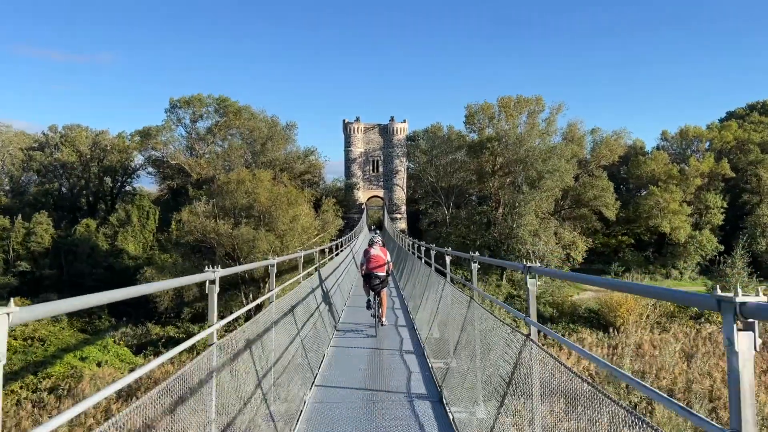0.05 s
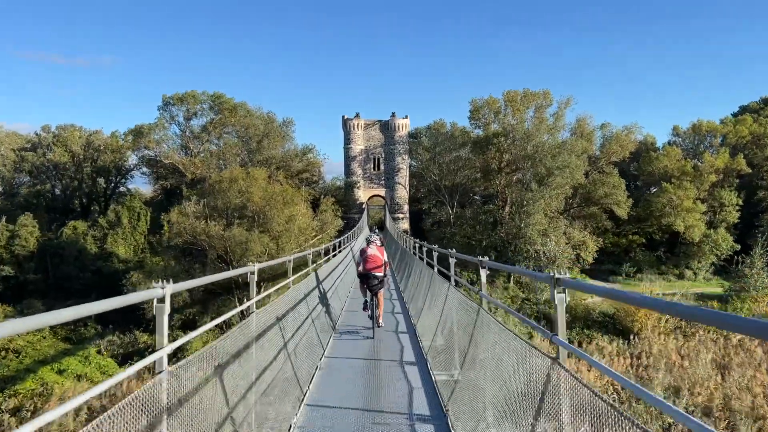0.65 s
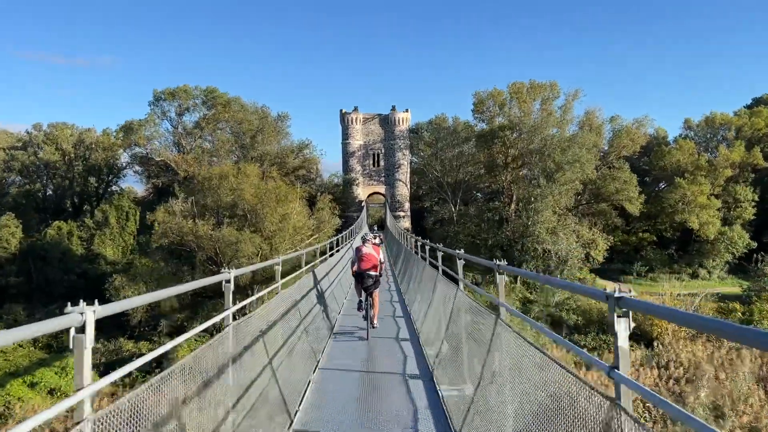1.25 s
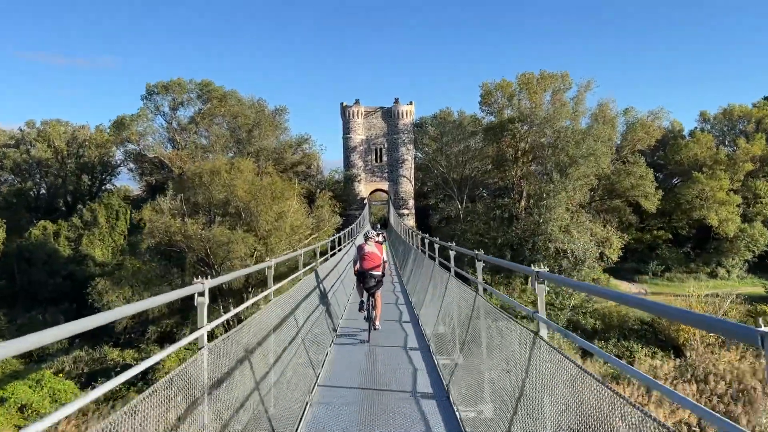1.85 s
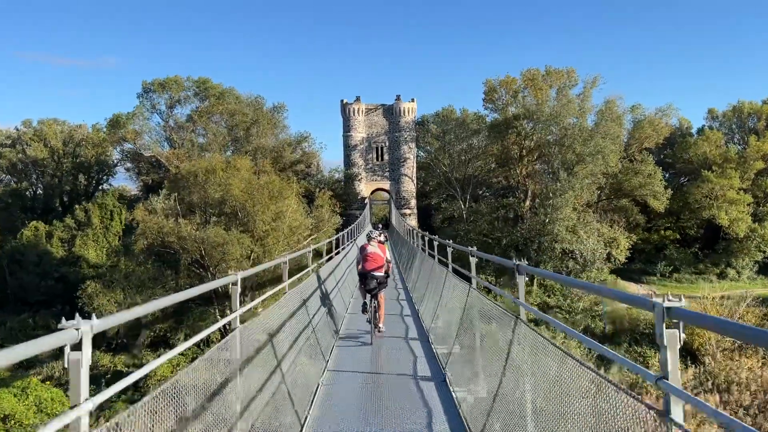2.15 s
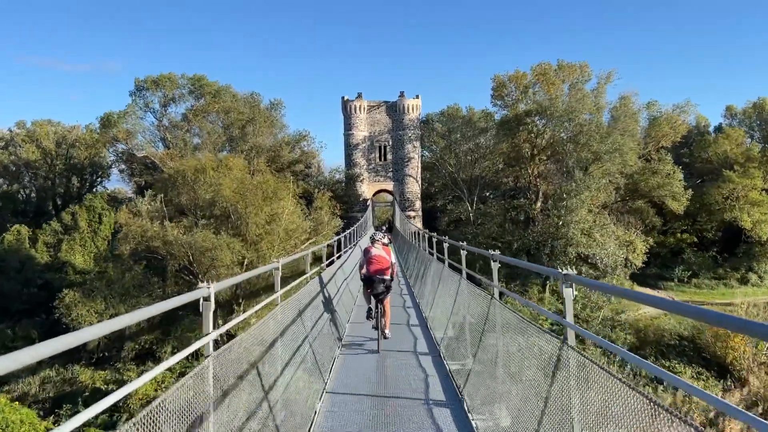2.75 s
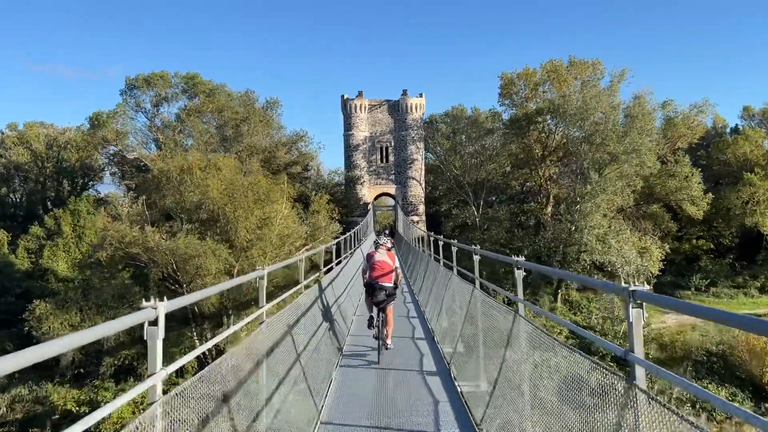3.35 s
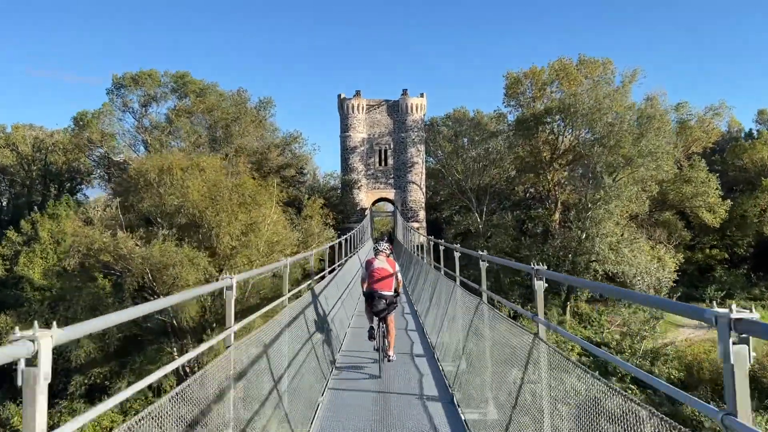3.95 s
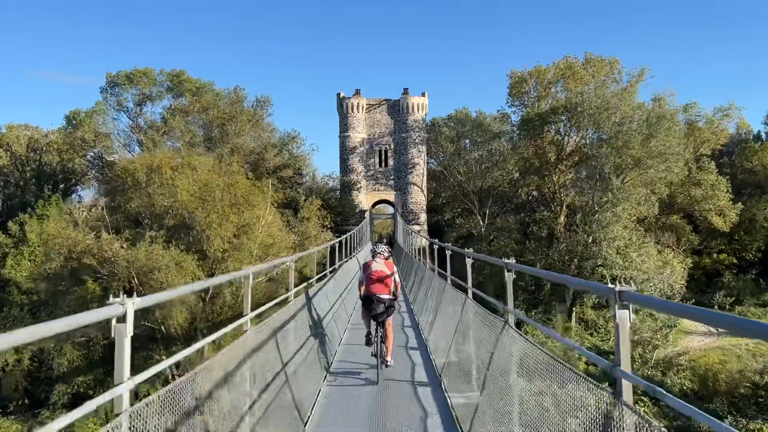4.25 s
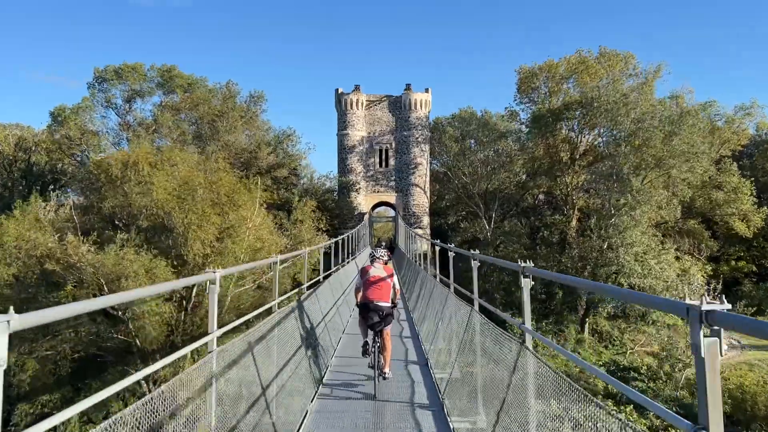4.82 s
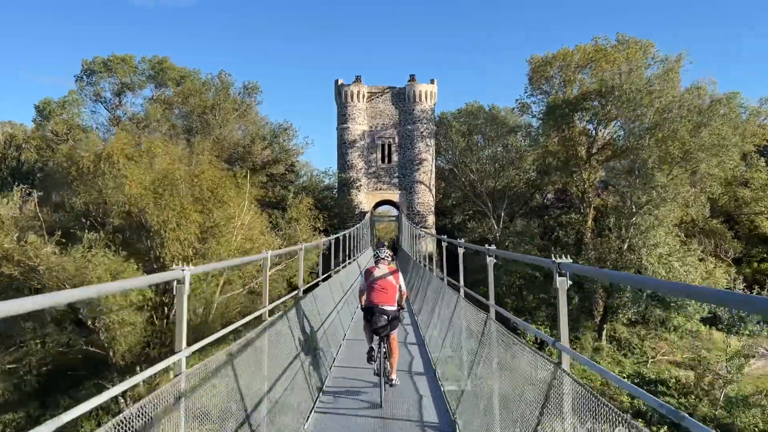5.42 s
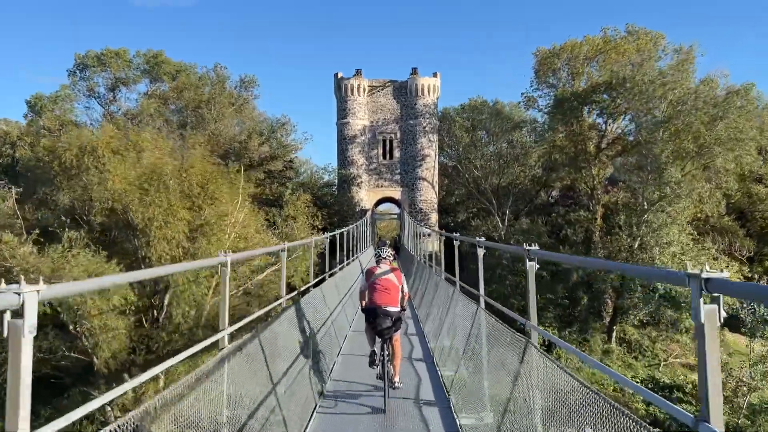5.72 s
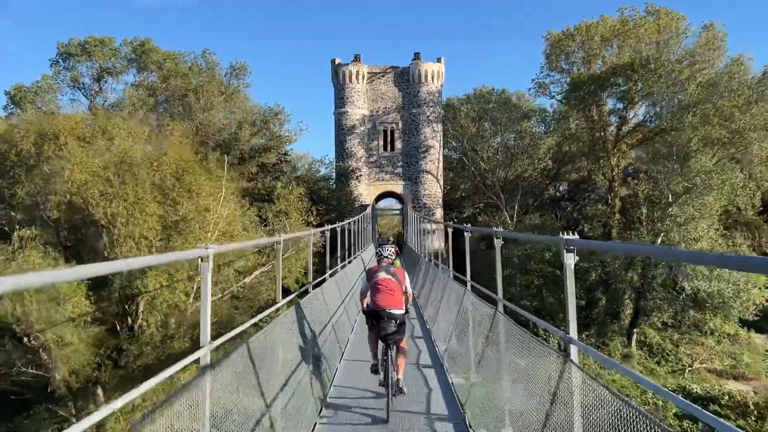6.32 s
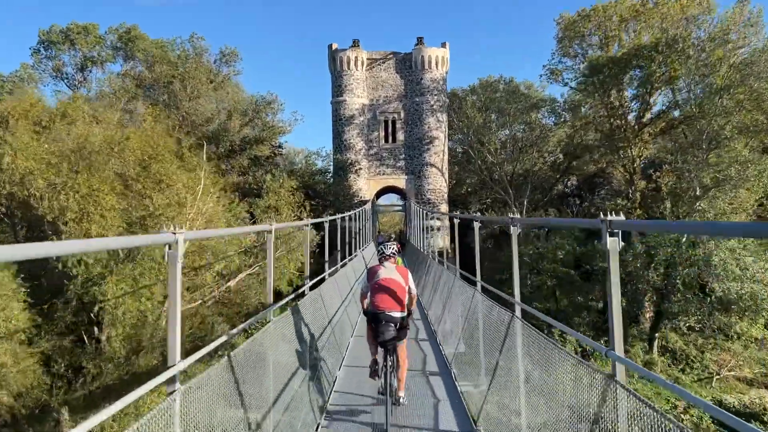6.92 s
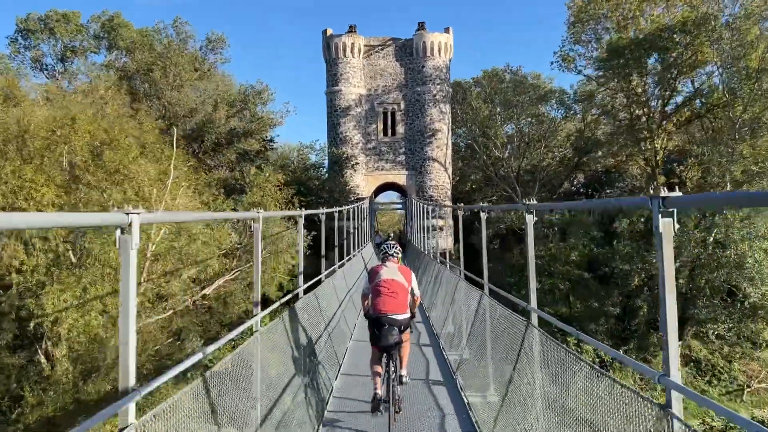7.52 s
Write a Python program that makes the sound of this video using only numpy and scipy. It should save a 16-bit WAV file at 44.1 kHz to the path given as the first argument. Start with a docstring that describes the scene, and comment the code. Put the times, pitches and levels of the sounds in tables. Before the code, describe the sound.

Two bicycles roll over a metal footbridge, tyres knocking and clattering at each joint while wind buffets the microphone.

```python
"""Hollow knocks and metal clatter, close up: two bicycles cross the deck of a suspension footbridge.
At each panel joint the front and then the rear tyre knocks, and the panel clatters under it.
Between joints the tyres drum on the deck, loose parts rattle and the steelwork rings faintly.
The stereo microphone rides on the rear bicycle, out in the headwind that buffets it."""
import sys
import numpy as np
from scipy import signal
from scipy.fft import rfft, irfft, next_fast_len
from scipy.io import wavfile
from scipy.ndimage import map_coordinates

SR = 44100
rng = np.random.default_rng(int(sys.argv[2]) if len(sys.argv) > 2 else 0)


def store_wav(level_fs):
    """Save 16-bit WAV to argv[1]."""
    pcm = np.round(np.clip(np.atleast_2d(level_fs), -1, 1) * 32767)
    wavfile.write(sys.argv[1], SR, pcm.T.astype(np.int16))


N = 333837


def amp(db):
    """Decibels to gain."""
    return 10 ** (np.asarray(db) / 20)


def unit(x):
    """x at rms 1."""
    return x / np.sqrt(np.mean(x ** 2) + 1e-20)


def luck(shape):
    """Even chance between minus one and one."""
    return rng.uniform(-1, 1, shape)


def along(points, hz):
    """(Hz, value) points joined on a log axis."""
    f, v = np.transpose(points)
    return np.interp(np.log(hz + 1), np.log(f + 1), v)


def curve(points):
    """(s, value) points joined, one value a sample."""
    return np.interp(np.arange(N) / SR, *np.transpose(points))


def wobble(rate):
    """A smooth random curve, rate knots a second."""
    knots = rng.standard_normal(int(N * rate / SR) + 4)
    return map_coordinates(knots, [np.arange(N) * rate / SR])


def struck(t, t60, rise):
    """The envelope of a blow: quick rise, exponential decay; times in seconds."""
    return amp(-60 * t / t60) * (1 - np.exp(-t / rise))


def filtered(x, response):
    """x times a complex response of frequency."""
    size = next_fast_len(N + SR // 2)
    return irfft(rfft(x, size) * response(np.fft.rfftfreq(size, 1 / SR)), size)[..., :N]


def add(track, s, sound):
    """Mix a sound into a track from time s on."""
    start = max(round(s * SR), 0)
    part = sound[..., :N - start]
    track[..., start:start + part.shape[-1]] += part


def buffet(level_db, spectrum, lump_db, rate):
    """Eddies of one size pass the microphone in lumps."""
    air = unit(filtered(rng.standard_normal((2, N)), lambda hz: amp(along(spectrum, hz))))
    return amp(level_db) * unit(air * amp(lump_db * wobble(rate)))


# single eddies right on the microphone: t/s, swell level/dB, pop level/dB
THUMPS = [(0.1426, -21, -18.5), (1.158, -13.5, -18), (2.782, -25, -12), (3.19, -22, -18), (3.203, -13, -18),
          (4.491, -22, -22), (4.846, -12, -30), (5.074, -26, -20), (5.084, -28, -25), (5.707, -32, -19.5),
          (5.906, -29, -24), (6.248, -35, -25), (6.711, -30, -19), (6.972, -20, -20), (7.053, -23, -22),
          (7.135, -30, -22)]
# spectrum of their swell: f/Hz, level/dB
THUMP_SPECTRUM = [(30, -32), (70, 2), (130, 8), (230, -1.5), (330, -0.5), (480, -0.5), (700, -5),
                  (2000, -47)]
def thumps(swell_db, swell_s, pop_s):
    """An eddy swells, pops with one pressure pulse and collapses."""
    swells, pops, t = np.zeros(N), np.zeros(N), np.arange(SR // 6) / SR
    u = (t - swell_s) / pop_s
    for s, db, pop_db in THUMPS:
        add(swells, s - swell_s, amp(db + swell_db) * (t / swell_s) ** 2 * np.exp(2 - 2 * t / swell_s))
        add(pops, s - swell_s, amp(pop_db) * (1 - u ** 2) * np.exp(-u ** 2 / 2))
    air = buffet(0, THUMP_SPECTRUM, lump_db=1.5, rate=30)
    return swells * air + pops * [[1], [0]]  # both ports feel a pop alike


def gusting(breeze_db, starts, lengths, levels, attack_s=0.01, release_s=0.023):
    """Wind level in dB: gusts rise, hold and drop back into the breeze."""
    t = np.arange(N) / SR
    power = amp(breeze_db) ** 2
    for s, length, db in zip(starts, lengths, levels):
        shape = np.clip((t - s) / attack_s, 0, 1) * np.clip(1 - (t - s - length) / release_s, 0, 1)
        power += (amp(db) * shape) ** 2
    return 10 * np.log10(power)


# steady airflow over the moving microphone: t/s, level/dB
BREEZE = [(0, -39.5), (2.2, -37), (3.1, -42), (3.8, -44), (4.2, -36.5), (5.3, -40.5), (6.8, -39),
          (7.57, -41)]
# gusts: t/s, length/s, rumble level/dB, flutter level/dB
GUSTS = [(0.01, 0.12, -34, -33), (0.636, 0.16, -32, -29), (0.93, 0.26, -30.5, -33.5),
         (1.58, 0.18, -32.5, -31), (1.834, 0.075, -35, -29.5), (2.352, 0.36, -30.5, -27.5),
         (2.557, 0.33, -28.5, -27.5), (3.163, 0.087, -33, -28.5), (4.145, 0.055, -40, -51),
         (4.342, 0.18, -37, -34), (4.796, 0.12, -28, -30.5), (5.04, 0.037, -27.5, -39),
         (5.532, 0.2, -33.5, -40), (5.847, 0.074, -27.5, -26), (6.122, 0.33, -37, -36),
         (6.682, 0.26, -35.5, -35), (6.94, 0.18, -31, -34.5)]
# spectra of large and of small eddies: f/Hz, level/dB
RUMBLE_SPECTRUM = [(10, -40), (25, -23), (38, -7), (52, -1.5), (90, 2.5), (125, -0.5), (190, -12.5),
                   (500, -62)]
FLUTTER_SPECTRUM = [(40, -34), (95, -19), (140, -3.5), (185, -5.5), (225, -2), (300, -11), (450, -15.5),
                    (900, -64), (3000, -69)]
def headwind():
    """Air on the microphone: large eddies rumble, smaller ones flutter, a few thump."""
    breeze_db = curve(BREEZE)
    starts, lengths, rumble_peaks, flutter_peaks = np.transpose(GUSTS)
    rumble_db = gusting(breeze_db, starts, lengths, rumble_peaks)
    flutter_db = gusting(breeze_db + 3, starts, lengths, flutter_peaks)
    rumble = buffet(rumble_db - 0.5, RUMBLE_SPECTRUM, lump_db=2, rate=22)
    flutter = buffet(flutter_db - 4, FLUTTER_SPECTRUM, lump_db=2.5, rate=31)
    return rumble + flutter + thumps(swell_db=-10.5, swell_s=0.0095, pop_s=0.0012)


# lightly damped modes of the bridge steel: f/Hz, level/dB, t60/s
STEEL_MODES = [(2627, -5.5, 0.56), (3235, -5, 1), (3975, 0.5, 0.76), (4500, -8, 0.58), (4720, 2, 0.2),
               (5310, -6, 0.67), (6500, -13, 0.37), (6020, -9, 0.92), (7050, -13, 0.76), (6955, -9, 0.7)]
# blows that make the nearest mode sing out: t/s, f/Hz, level/dB
SINGING = [(0.3, 3975, -41), (1.184, 3975, -36.5), (1.184, 6020, -38), (1.184, 7050, -40),
           (1.385, 5310, -45), (1.385, 2627, -46), (1.621, 2627, -34), (1.621, 3975, -40),
           (2.908, 3975, -36), (3.108, 6020, -54), (3.34, 3975, -35), (3.54, 2627, -35), (3.54, 3975, -42),
           (3.776, 3235, -38), (5.335, 3235, -35), (5.578, 4500, -33), (6.035, 4500, -48),
           (6.317, 4500, -39), (6.515, 3975, -36), (6.737, 4500, -38), (6.995, 3235, -50),
           (7.22, 6955, -38), (7.22, 4500, -44)]
def steelwork(level_db, spread_db, detune, waver_rad):
    """Every blow leaves the steel around the bicycles ringing faintly; now and then one mode sings."""
    track, t = np.zeros((2, N)), np.arange(SR * 3 // 4) / SR
    nearest = lambda near_hz: min((mode[0] for mode in STEEL_MODES), key=lambda hz: abs(hz - near_hz))
    blows = [(s, db) for s, *_, db, _, _ in CROSSINGS] + [(s, db) for s, db, *_ in RATTLES]
    panel = np.searchsorted(sorted(row[0] for row in CROSSINGS), np.arange(N) / SR)
    for hz, mode_db, t60 in STEEL_MODES:
        power, ring = np.zeros(N), struck(t, t60, rise=0.0023)
        for (s, db), share in zip(blows, luck(len(blows))):
            add(power, s, (amp(db + level_db + mode_db + spread_db * share) * ring) ** 2)
        for s, near_hz, db in SINGING:
            if nearest(near_hz) == hz:
                add(power, s, (amp(db) * struck(t, t60=2.1, rise=0.0023)) ** 2)
        # each panel is tuned a little differently, and continued shaking makes the phase wander
        pitch = hz * (1 + detune * luck((2, len(CROSSINGS) + 1)))[:, panel]
        wander = waver_rad * np.cumsum(rng.standard_normal((2, N)), axis=1) / np.sqrt(SR)
        track += np.sqrt(power) * np.sin(2 * np.pi * np.cumsum(pitch, axis=1) / SR + wander)
    return track


def contacts(rate, spread_db, hiss, size=N):
    """Two unrelated streams of tiny impacts, rate a second, over smooth friction noise."""
    shape = (2, size)
    hits = (rng.random(shape) < rate / SR) * rng.choice([-1, 1], shape)
    strength = amp(spread_db * rng.standard_normal(shape))
    return unit(unit(hits * strength) + hiss * rng.standard_normal(shape))


def weak_modes(force, t60):
    """A dense crowd of weak modes, a different one for each stretch of deck."""
    track, t, stretch = np.zeros((2, N)), np.arange(SR // 6) / SR, SR // 3
    for start in range(0, N, stretch):
        modes = rng.standard_normal((2, len(t))) * amp(-60 * t / t60)
        modes /= np.linalg.norm(modes, axis=1, keepdims=True)
        add(track, start / SR, signal.fftconvolve(force[:, start:start + stretch], modes, axes=1))
    return track


# panel resonances: f/Hz, width/Hz, level/dB over the broad response
DECK_MODES = [(228.5, 9.3, 3.5), (347, 69, -1), (551, 32, -0.5), (856, 59, 0.5), (1540, 67, -5),
              (1943, 77, -4), (2164, 90, -8.5), (2650, 79, -3), (3320, 44, -10), (4010, 140, -6.5),
              (4474, 450, 1.5), (5220, 180, -9), (6070, 300, 0), (8220, 170, -6), (8880, 95, 0.5)]
def deck(force, spectrum, ring=0, ring_t60=0.1, modes_db=0):
    """Force heard through the panels: a few strong modes and, by the share ring, many weak ones."""
    def response(f):
        modes = sum(amp(db + modes_db) * 1j * f * width / (hz * hz - f * f + 1j * f * width)
                    for hz, width, db in DECK_MODES)
        return amp(along(spectrum, f)) * (1 + modes)
    if ring:
        force = (force + ring * weak_modes(force, ring_t60)) / np.hypot(1, ring)
    gain = np.sqrt(np.mean(np.abs(response(np.linspace(0, SR / 2, SR // 8))) ** 2))
    return filtered(force, response) / gain


# how hard the deck shakes under the tyres: t/s, level/dB
SHAKING = [(0.0, -31.5), (0.19, -29), (1.54, -29.5), (2.13, -28), (2.23, -26.5), (2.97, -28.5), (3.58, -28),
           (3.94, -28.5), (4.49, -28.5), (5.25, -26.5), (5.44, -27.5), (6.37, -29), (6.77, -27),
           (6.92, -24.5), (7.06, -30), (7.25, -28.5), (7.57, -27)]
# spectra of tyre drumming and panel chatter: f/Hz, level/dB
DRUM_SPECTRUM = [(60, -44), (170, -10.5), (235, -0.5), (300, -7), (440, -3), (680, -1), (950, -0.5),
                 (1400, -3), (2100, -5.5), (3200, -12), (6000, -16.5), (15000, -62)]
CHATTER_SPECTRUM = [(300, -83), (1200, 7), (2200, 0), (3300, 3.5), (4500, -2), (6200, -1.5), (8000, -4),
                    (10000, -14), (11800, -6.5), (15000, -23)]
def rolling(level_db, chatter_growth):
    """Tyres drum on the rough panels below, which chatter the more the harder they shake."""
    shake_db = curve(SHAKING)
    chatter_db = shake_db.mean() + chatter_growth * (shake_db - shake_db.mean())
    bumps_db = level_db + 1.6 * wobble(rate=50)
    drum = amp(shake_db + bumps_db) * contacts(rate=900, spread_db=1, hiss=1)
    chatter = amp(chatter_db + bumps_db) * contacts(rate=2400, spread_db=2, hiss=0.9)
    drumming = deck(drum, DRUM_SPECTRUM, ring=0.26, ring_t60=0.15)
    return drumming + deck(chatter, CHATTER_SPECTRUM, ring=1, ring_t60=0.071)


def pock(hz, t60, rise):
    """A few cycles of a tyre slapping metal."""
    t = np.arange(SR // 25) / SR
    return np.sin(2 * np.pi * hz * t) * struck(t, t60, rise)


def small_bumps(level_db, spread_db, centre_hz, count):
    """Small bumps in the deck give weak pocks at random."""
    track, shake_db = np.zeros(N), curve(SHAKING)
    for at, (size, detune) in zip(rng.integers(0, N, count), luck((count, 2))):
        slap = pock(centre_hz * 1.52 ** detune, t60=0.0078, rise=0.00033)
        add(track, at / SR, amp(shake_db[at] + level_db + spread_db * size) * slap)
    return track


def flurries(times, levels, t60, rise, colour_db):
    """Tiny impacts die away after each blow; every panel colours its own a little."""
    track, t = np.zeros((2, N)), np.arange(SR // 2) / SR
    hz, knots_hz = np.fft.rfftfreq(len(t), 1 / SR), np.arange(0, SR, 450)
    for s, db, decay in np.broadcast(times, levels, t60):
        colour = amp(colour_db * np.interp(hz, knots_hz, luck(len(knots_hz))))
        impacts = contacts(rate=2600, spread_db=0.5, hiss=0.18, size=len(t))
        flurry = unit(irfft(rfft(impacts) * colour, len(t)))
        add(track, s, amp(db) * flurry * struck(t, decay, rise))
    return track


# loose parts rattling by themselves: t/s, treble level/dB, middle level/dB, ping level/dB, t60/s
RATTLES = [(0.042, -23, -24, -33.5, 0.25), (0.226, -20, -35, -41, 0.3), (0.709, -18.5, -29, -28, 0.15),
           (0.795, -21, -10.5, -51, 0.26), (1.002, -22, -30, -31.5, 0.33), (1.267, -32, -31, -39, 0.4),
           (2.438, -24, -9, -44, .15), (3.798, -22.5, -16.5, -42, .22), (4.19, -27, -30, -32, 0.22),
           (4.271, -30, -20, -40, 0.45), (4.55, -29.5, -30, -34, .15), (4.716, -25, -21, -50, 0.52),
           (5.03, -23, -47, -31, 0.25), (5.074, -20.5, -18, -43, 0.23), (5.213, -29, -17, -42, .25),
           (5.232, -19.5, -20, -33, 0.59), (5.773, -18.5, -17, -57, 0.26), (6.093, -21, -11.5, -37, 0.15),
           (6.317, -19.5, -22, -36, .29), (6.496, -20.5, -16, -47, .29), (6.652, -23, -19, -29.5, 0.18),
           (6.787, -19, -20, -40, 0.29), (6.872, -21, -36, -20.5, 0.2), (6.968, -20.5, -32, -31, 0.58),
           (7.41, -16.5, -30, -21, 0.15)]
# spectra of small steel parts jingling and pinging: f/Hz, level/dB
JINGLE_SPECTRUM = [(300, -72), (1200, 7), (2200, -2.5), (3300, 2.5), (4500, -1), (6200, -0.5), (8000, -4),
                   (10000, -3), (11800, -4), (15000, -17)]
PING_SPECTRUM = [(3000, -40), (4500, -13), (5300, -24), (6100, -11), (6700, -29), (6990, 2.5), (7150, -15),
                 (7700, -18), (12000, -44)]
def rattles():
    """Loose parts jingle briefly, some with a duller body, some with a high ping."""
    times, treble_db, middle_db, ping_db, t60 = np.transpose(RATTLES)
    bright = flurries(times, treble_db, t60, rise=0.0005, colour_db=3)
    dull = flurries(times, middle_db, t60 / 2, rise=0.001, colour_db=5)
    ping = flurries(times, ping_db, t60, rise=0.00042, colour_db=8)
    jingle = amp(-1.5) * deck(bright, JINGLE_SPECTRUM, ring=0.91, ring_t60=0.094)
    return jingle + amp(-11.5) * deck(dull, DRUM_SPECTRUM) + amp(2) * deck(ping, PING_SPECTRUM)


# panels with a pitch of their own when crossed: t/s, f/Hz, level/dB
CLANGS = [(0.302, 4450, -29), (0.953, 4560, -30), (1.624, 4700, -31), (2.048, 4100, -22),
          (2.247, 4570, -30), (2.676, 4600, -28), (2.908, 4050, -22), (2.908, 4650, -26), (3.11, 4390, -31),
          (3.342, 4130, -25), (3.984, 4340, -36), (4.429, 5770, -29), (4.67, 4700, -29), (6.517, 5170, -32),
          (6.739, 4480, -30), (7.48, 4640, -22)]
def clangs(t60, rise, count, spread):
    """A loose panel rings briefly on a cluster of close, beating modes."""
    track, t = np.zeros((2, N)), np.arange(SR // 3) / SR
    for s, hz, db in CLANGS:
        detune, phase = luck((2, 2, count, 1))
        modes = np.sin(2 * np.pi * hz * (1 + spread * detune) * t + np.pi * phase)
        add(track, s, amp(db) * unit(modes.sum(axis=1)) * struck(t, t60, rise))
    return track


# spectra of a struck panel's snap, crash, hollow body and rattling tail: f/Hz, level/dB
SNAP_SPECTRUM = [(500, -43), (2000, -20), (4500, 12), (7000, 4.5), (9000, 6.5), (12000, 7.5), (14000, 3.5),
                 (15500, 2.5)]
CRASH_SPECTRUM = [(500, -35), (1300, -7), (2000, -2), (3200, -4), (4500, -4), (6200, -4), (8000, -10.5),
                  (10000, -15), (12000, -19), (15000, -20)]
HOLLOW_SPECTRUM = [(100, -45), (250, -18), (450, -3), (800, -0.5), (1300, 6.5), (1800, -6), (3000, -38),
                   (8000, -60)]
TAIL_SPECTRUM = [(60, -52), (250, -28), (450, -6), (800, 0), (1300, 1.5), (2000, -1.5), (3200, -3.5),
                 (4500, -4), (6200, -10.5), (8000, -12), (10000, -23), (12000, -13), (15000, -23)]
def clatter(scuff_lead_s, lag_s):
    """Grazed by the tyre, a panel snaps against its frame, crashes, swells hollowly and rattles on."""
    times, *_, body_db, crash_db, snap_db, tail_t60 = np.transpose(CROSSINGS)
    after = times + lag_s
    scuff = flurries(times - scuff_lead_s, snap_db - 0.5, t60=0.034, rise=0.0013, colour_db=10)
    snap = flurries(after, snap_db, t60=0.09, rise=0.0003, colour_db=2.5)
    crash = flurries(after, crash_db, t60=0.13, rise=0.0008, colour_db=3.5)
    body = flurries(after, body_db, t60=0.13, rise=0.0057, colour_db=7)  # low bending waves are slow
    tail = flurries(after, crash_db, tail_t60, rise=0.018, colour_db=4)
    return (amp(10) * deck(scuff + snap, SNAP_SPECTRUM, ring=0.54, ring_t60=0.083)
            + amp(1.84) * deck(crash, CRASH_SPECTRUM, ring=1, ring_t60=0.086, modes_db=-7)
            + amp(1) * deck(body, HOLLOW_SPECTRUM, modes_db=-2)
            + amp(0.5) * deck(tail, TAIL_SPECTRUM, ring=0.99, ring_t60=0.14, modes_db=-1))


# tyres on the joints just below the microphone, rear and front in turn: t/s, knock level/dB, knock f/Hz,
# rebound level/dB re knock, clunk level/dB, body level/dB, crash level/dB, snap level/dB, tail t60/s
CROSSINGS = [(0.061, -11, 820, -3, -9, -19, -21.5, -36, 0.68),
             (0.3, -10, 1140, -5, -10, -28, -21.5, -29, 0.49),
             (0.508, -11, 990, -1, -7.5, -21, -20, -29.5, 0.5),
             (0.748, -5.5, 1090, -8, -30, -25, -25, -36, 0.55),
             (0.951, -12, 855, -9, -12, -19, -22.5, -30.5, 0.51),
             (1.185, -11, 1060, -11, -22, -22.5, -24, -35, 0.32),
             (1.385, -14.5, 1320, -2, -16, -26, -29, -34.5, 0.33),
             (1.6206, -2, 1030, -13, -4.5, -20, -19, -27, 0.51),
             (1.817, -16, 1400, -3, -9.5, -17, -20, -28.5, .36),
             (2.047, -7, 970, -5, -12, -16, -19, -25.5, 0.53),
             (2.245, -8.5, 940, -3, -16, -15, -16, -28.5, .34),
             (2.475, -1.5, 1110, -3, -28, -15.5, -16, -26, 0.36),
             (2.6732, -5.5, 1430, -4, -10, -20.5, -15.5, -25, 0.47),
             (2.906, -8, 1000, -6, -28, -15.5, -18, -26, 0.55),
             (3.108, -8.5, 920, -5, -30, -21.5, -17, -32, 0.36),
             (3.34, -6, 993, -6, -9, -15, -20, -32, 0.39),
             (3.54, -12.5, 950, -6, -31, -24, -26.5, -38, 0.72),
             (3.777, -7.5, 870, -5, -17, -17, -21.5, -32, 0.29),
             (3.982, -8.5, 1340, -7, -13, -21, -17.5, -36.5, 0.26),
             (4.222, -12, 1030, -12, -27, -25.5, -27.5, -42, 0.57),
             (4.427, -12, 990, -8, -8, -21.5, -20.5, -39, 0.36),
             (4.668, -9, 1060, -1, -7, -19, -21.5, -28, 1),
             (4.877, -11, 825, -3, -32, -19, -19.5, -32.5, 0.32),
             (5.122, -12.5, 1070, -2, -10, -27, -27, -36, .42),
             (5.335, -10.5, 1340, -7, -6.5, -23, -18.5, -40, 0.53),
             (5.579, -11, 950, -7, -11, -25, -21.5, -35, 0.3),
             (5.791, -18, 1435, -6, -14, -18, -20, -46, 0.42),
             (6.035, -22, 1290, -5, -38, -21, -23.5, -40.5, 0.4),
             (6.255, -19, 1600, -5, -38, -31, -29.5, -46, 0.44),
             (6.515, -4, 1110, -3, -35, -19, -15.5, -27, 0.43),
             (6.737, -10, 1280, -4, -27, -18, -15.5, -28.5, 0.38),
             (6.995, -11, 860, -7, -19, -21, -19, -30, 0.38),
             (7.22, -15.5, 1250, -1, -18, -27, -21, -34, 0.28),
             (7.478, -21, 1400, 2, -15, -21, -18, -25.5, 0.25)]
def knocks(level_db, t60, rise, rebound_s, clunk_hz):
    """A tyre strikes the next panel, which sinks with a clunk, and rebounds once at a nearby pitch."""
    track = np.zeros(N)
    for s, db, hz, rebound_db, clunk_db, *_ in CROSSINGS:
        gap, detune, panel = luck(3)
        knock = amp(db + level_db) * pock(hz, t60, rise)
        clunk = amp(clunk_db) * pock(clunk_hz * (1 + 0.11 * panel), t60=0.02, rise=0.0021)
        rebound = amp(db + level_db + rebound_db) * pock(hz * (1 + 0.16 * detune), t60, rise)
        add(track, s, knock)
        add(track, s - 0.0012, clunk)
        add(track, s + rebound_s * (1 + gap / 4), rebound)
    return track


# how alike deck and air arrive at the microphone's two ports: f/Hz, likeness/0-1
LIKENESS = [(60, 0.97), (160, 0.9), (300, 0.8), (550, 0.096), (750, 0.9), (1400, 0.71), (1900, 0.34),
            (3400, 0.2), (4500, 0.11), (6200, 0.1), (7000, 0.9), (7700, 0.22), (8600, 0.45), (9300, 0.98),
            (10900, 1), (11600, 0.15), (12600, .97), (14000, 1), (15200, .4)]
def scene():
    """From the rear bicycle: knocks reach both ports alike, the wide deck and the air only partly so."""
    metal = steelwork(level_db=-18, spread_db=6.5, detune=0.009, waver_rad=7)
    metal += clatter(scuff_lead_s=0.002, lag_s=0.0015)
    metal += clangs(t60=0.23, rise=0.002, count=4, spread=0.02)
    shared, apart = metal + rattles() + rolling(level_db=-3, chatter_growth=2.4) + headwind()
    tyres = knocks(level_db=8, t60=0.01, rise=0.0015, rebound_s=0.00389, clunk_hz=706)
    tyres += small_bumps(level_db=1.5, spread_db=4.5, centre_hz=1060, count=240)
    width = lambda hz: np.arccos(np.clip(along(LIKENESS, hz), 0, 1)) / 2
    mid = tyres + filtered(shared, lambda hz: np.cos(width(hz)))
    side = filtered(apart, lambda hz: np.sin(width(hz)))
    return np.array([mid + side, mid - side])


# left port over right: f/Hz, level/dB
PORT_BALANCE = [(100, 1), (400, 0), (580, 2.5), (850, -1), (1500, -3), (3000, -0.5), (4400, -2), (5200, 6),
                (6300, 4), (7500, 3), (9000, 0)]
# left port ahead of right: f/Hz, phase/rad
PORT_LEAD = [(100, 0), (380, -.3), (620, 1.3), (1000, .6), (1500, .35), (3000, .9), (4500, 1.9),
             (5500, -.8), (6800, .25), (7800, -.8), (8600, -1.9), (9200, -3.1), (10900, -3.2),
             (11600, -4.7), (12500, -6.25), (14000, -6.4), (15600, -8.6)]
def record(dry):
    """The microphone's two ports differ in colour and phase; nothing passes above 15750 Hz."""
    half = np.array([[1], [-1]]) / 2
    ports = lambda hz: amp(half * along(PORT_BALANCE, hz)) * np.exp(1j * half * along(PORT_LEAD, hz))
    return filtered(dry, lambda hz: ports(hz) * (hz < 15750))


dry = scene()
out = record(dry)
store_wav(out)
```